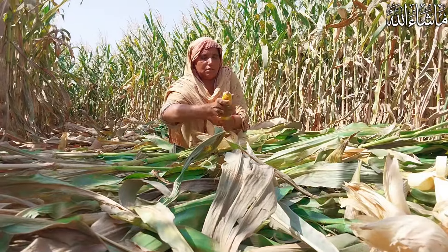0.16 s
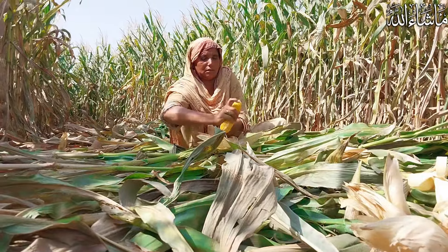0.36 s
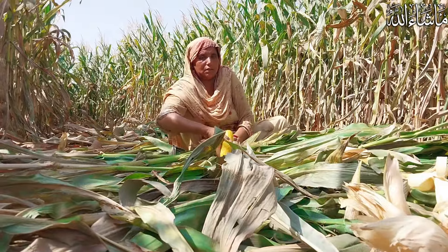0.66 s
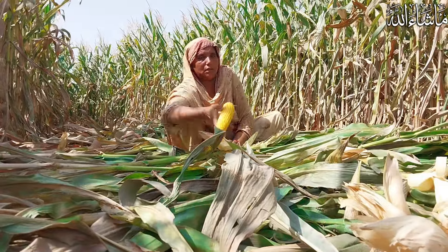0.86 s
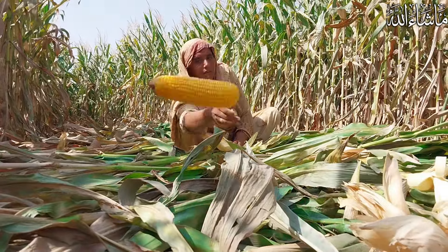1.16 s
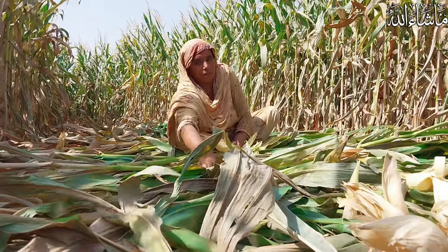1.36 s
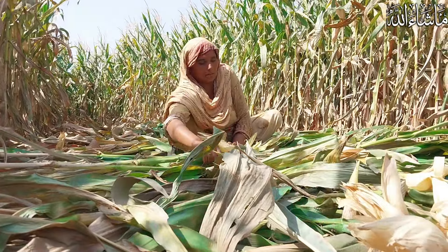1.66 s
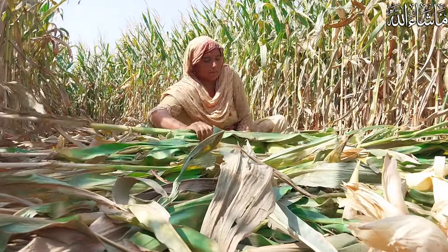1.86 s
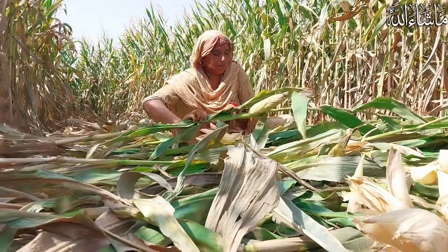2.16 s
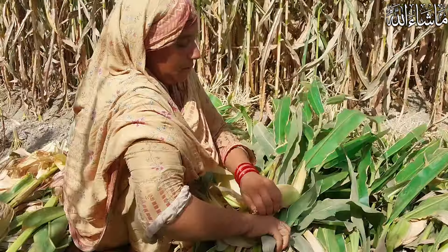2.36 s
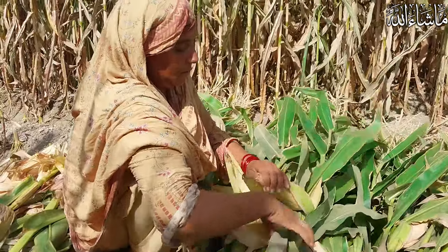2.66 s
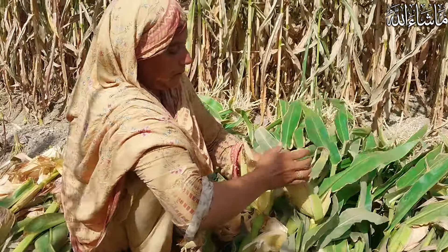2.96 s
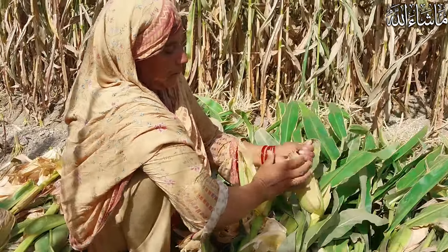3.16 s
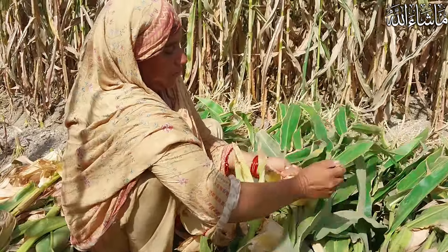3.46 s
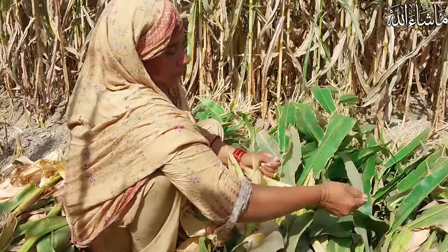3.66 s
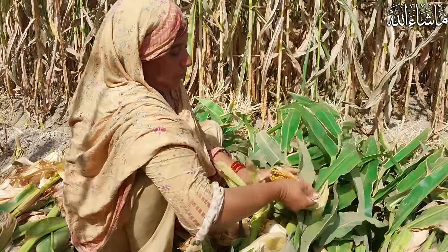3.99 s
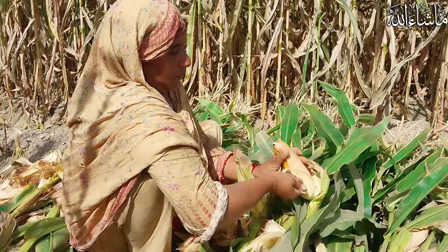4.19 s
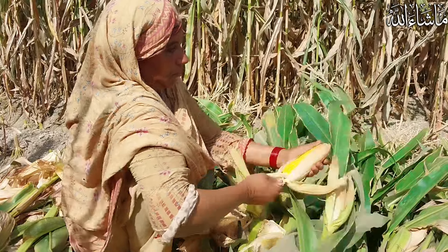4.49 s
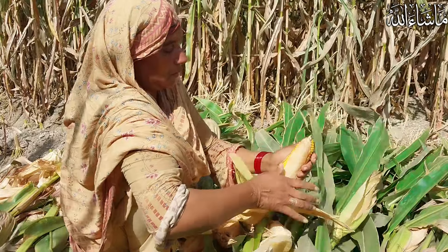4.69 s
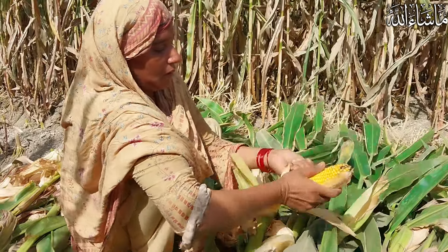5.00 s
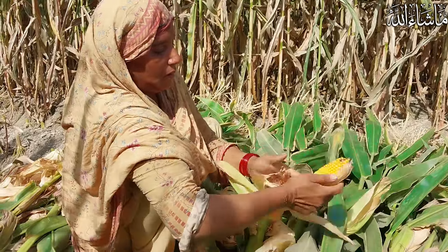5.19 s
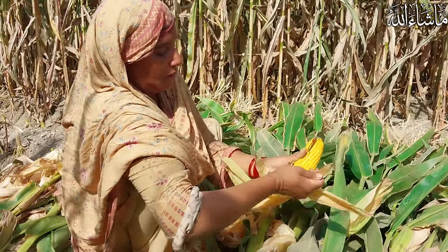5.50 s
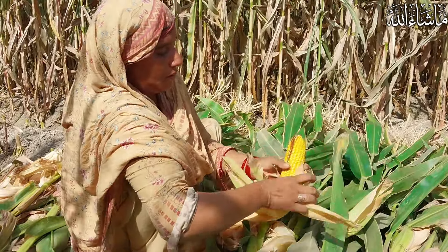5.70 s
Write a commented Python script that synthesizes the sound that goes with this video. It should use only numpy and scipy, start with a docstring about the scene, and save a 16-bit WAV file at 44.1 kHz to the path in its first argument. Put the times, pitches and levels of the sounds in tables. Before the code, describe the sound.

Dry corn husks rustle, crackle and tear under busy hands, quiet at first, then close and loud, over a faint throbbing engine.

```python
"""Corn leaves crinkle and tear under the hands as an ear is husked: random creases excite filtered noise.
Husks squeak by stick-slip as short wavering tones, and snap as resonances struck by dying noise.
A cob and the hands drop on a springy heap of leaves, whose four modes ring low.
Behind them a distant single-cylinder pump engine throbs in harmonics of its firing rate, and the field hisses.
Two microphone ports hear the handling a little to the right, by differences of level and arrival time."""
import sys
import numpy as np
from scipy import signal
from scipy.fft import rfft, irfft, next_fast_len
from scipy.io import wavfile
from scipy.ndimage import uniform_filter1d, map_coordinates

SR = 44100
rng = np.random.default_rng(int(sys.argv[2]) if len(sys.argv) > 2 else 0)


def put_to_file(sound):
    """Save the sound as 16-bit audio at rate SR, in the file named by the first command-line argument."""
    columns = np.atleast_2d(sound).T  # one column per channel
    safe = np.clip(columns, -1, 1)
    whole_steps = np.round(safe * 32767)
    wavfile.write(sys.argv[1], SR, whole_steps.astype(np.int16))


N = 257544

# Relative noise spectra: [f/Hz, spectral level/dB per Hz]
# standing corn stirring all round
FIELD_SPECTRUM = [(180, -47), (300, -20), (954, -14), (1180, -16), (2040, 3), (2660, -21), (4230, -2),
                  (8600, -48), (12400, -8), (15600, -5.5)]
# engine drone
DRONE_SPECTRUM = [(16, -54), (28, -21), (40, -1), (60, -1), (108, 2.5), (130, -9.5), (200, -10.5),
                  (344, -40), (450, -61), (580, -75), (990, -120)]
# leaf crinkle
CRINKLE_SPECTRUM = [(590, -18.5), (1000, -8.5), (1050, -10), (1200, -8.5), (1430, -6.5), (1720, -5.5),
                    (1960, -1), (3970, -1), (5430, -1.5), (7280, -3), (9000, -17), (11700, -62),
                    (19800, -120)]
# bright sizzle of tearing fibres
SIZZLE_SPECTRUM = [(5500, -43), (8000, -9), (9100, -7), (11100, 1.5), (13600, 0), (15600, -4.5)]
# husk body
BODY_SPECTRUM = [(150, -70), (280, -5), (400, -0.5), (800, 0.5), (1300, -4.5), (1900, -1), (3500, -39)]
# heap thumping under the leaves
THUMP_SPECTRUM = [(50, -54), (120, -3.5), (210, 2.5), (330, -6), (520, -29), (1000, -72)]

FIRING_HZ, FIRST_FIRING_S = 16.89, 0.0487
# Third and fourth engine orders, before breeze and lean: [median rms level/dB]
STRONG_ORDERS_DB = (-54, -54.5)
# Upper engine orders, before breeze and lean: [multiple of firing rate, median rms level/dB]
UPPER_ORDERS = [(5, -62), (6, -57.5), (7, -65), (8, -67)]
# Slowly sinking hums just under the two strong orders, so that each pair beats:
# [start t/s, end t/s, median rms level/dB, in-phase t/s, beat rate there/Hz, beat rate growth/(Hz per s)]
HUMS = [(3, 6.5, -52.5, 2.365, 2.113, 0.334), (0, 2.22, -53, 0.38, 1.92, 0.41)]
HUM_FADE_S = 0.06
# How well the engine carries on the breeze: [t/s, level over usual/dB]
BREEZE = [(0, -1.5), (1.1, -1.5), (2, 0), (2.4, 4), (3.2, 0), (3.9, 0.5), (4.8, 1), (5.84, -0.5)]
ENGINE_LEAN_DB = -1.5  # left minus right

# Modes of the heap, relaxed and at pitch factor 1: [f/Hz, level/dB, t60/s]
HEAP_MODES = [(127.6, -3, 0.067), (229, -6, 0.03), (460, -3.5, 0.022), (690, -9, 0.022)]
# Cob and hands dropping on the heap:
# [t/s, level/dB, pitch factor, second mode gain/dB, upper modes gain/dB]
THUDS = [(0.044, -43, 1.42, -15, -15), (1.4143, -35.5, 1.14, 12.5, 10), (1.4227, -18.5, 0.934, 1, 1),
         (1.456, -33, 1.08, -6, -8), (1.5112, -40, 1.8, -2, -8), (1.5407, -23.5, 1.28, -0.5, -16),
         (1.809, -33, 1.3, -21, -6.5), (2.792, -35, 0.84, -4, -13), (2.872, -30.5, 1.46, -2, -13),
         (3.574, -27.5, 1.28, -10, -17), (4.579, -26.5, 1.37, -9, -6), (4.598, -28.5, 1.43, -13, -5)]
STIFFER, RELAX_S = 1.47, 0.0061  # initial pitch rise as a share of the lowest mode; its time constant
SMOTHER = 2  # exponent over 1: the ring holds, then loose leaves choke it

# Husk and stalk ringing as they slip or give: [middle t/s, nominal level/dB, middle f/Hz, length/s]
CREAKS = [(0.105, -52, 2010, 0.037), (0.374, -55, 1900, .025), (2.3746, -13, 2740, 0.002),
          (2.378, -14.5, 2280, 0.0026), (2.379, -21.5, 620, 0.0073), (2.392, -10, 900, 0.0034),
          (2.393, -6, 3450, 0.0019), (3.429, -30.5, 1440, 0.012), (3.481, -38, 1020, .015),
          (3.494, -29, 2310, 0.016), (3.504, -26.5, 1037, 0.019), (3.509, -25, 1880, 0.019),
          (3.523, -30, 1024, 0.016), (3.525, -25, 1990, 0.0065), (3.559, -26.5, 2000, 0.014),
          (3.585, -24, 1085, 0.015), (3.592, -22, 2870, 0.0028), (3.477, -31, 1610, 0.012),
          (3.502, -33, 3050, 0.01), (3.527, -28.5, 3240, 0.014), (3.566, -32, 2130, 0.01),
          (3.599, -28, 1450, 0.012), (3.636, -29, 1350, 0.0053), (3.578, -30, 1970, .01),
          (3.575, -24, 2950, 0.0053)]
# Husks and stalks snapping:
# [t/s, knock level/dB, centre f/Hz, relative crack setting/dB, nominal t60/s, left minus right level/dB]
SNAPS = [(0.302, -39, 4310, -11, 0.025, -2), (0.434, -53, 2100, 11, 0.018, -2),
         (1.327, -22, 4960, 4, 0.015, 11), (1.335, -23.5, 4460, -1.5, 0.029, -12),
         (1.414, -15, 4050, 12, 0.013, -2), (1.421, -19, 1460, 3.5, 0.011, -9.5),
         (1.455, -29.5, 1280, 4.5, 0.013, -3), (1.54, -30, 1240, 6.5, 0.022, -3.5),
         (1.809, -26.5, 4800, -6, 0.19, 5.5), (2.153, -29.5, 4930, -5, 0.045, 2),
         (2.307, -32, 2020, 6, 0.016, 0), (2.3745, -12, 2590, -1.5, 0.029, -8),
         (2.391, -2.5, 1530, -5, 0.012, -2.5), (2.475, -29, 2890, -1, .012, -4),
         (2.5975, -20, 6500, 4.5, 0.0069, -6), (2.562, -28, 1500, -6, 0.0097, 0),
         (2.725, -27.5, 1800, 5, 0.016, -11), (2.752, -28.5, 2500, 7.5, 0.0074, -5),
         (2.786, -24, 2000, -6, .012, -4), (2.837, -20, 3000, -5, 0.013, -9),
         (3.095, -34, 6000, 9, 0.0092, -9), (3.153, -32.5, 4570, -6, 0.012, -7),
         (3.201, -31.5, 1410, 3, 0.055, -4), (3.252, -28.5, 3340, 2, 0.022, -4),
         (3.324, -30, 2340, -7, .012, -7), (3.369, -27, 2490, -11, 0.0093, 0),
         (3.398, -13.5, 4500, -4, 0.0085, -7), (3.523, -20, 2800, -19, 0.024, 7.5),
         (3.623, -17, 1410, -16, 0.011, 2), (3.636, -18, 1410, -19, 0.028, -2),
         (4.259, -25, 3560, -19, 0.037, -6), (4.286, -23, 3270, -20, 0.011, 6),
         (4.303, -27.5, 3500, -2.5, 0.0092, -7), (4.404, -21, 1450, -8, 0.019, 1),
         (4.47, -24, 3190, 3, 0.012, -4), (4.578, -24, 2020, -11, 0.022, 1),
         (4.965, -26, 2500, -8, 0.017, -4), (5.158, -44, 3000, -5.5, 0.011, -4),
         (5.312, -28, 4000, 8, .012, -4), (5.321, -35.5, 2700, 11.5, 0.015, -14),
         (5.354, -31, 2200, 3, 0.027, -5), (5.513, -37, 4000, -4, .012, -4),
         (5.522, -29, 4000, -4, .012, -6), (5.632, -36, 2470, -9, 0.02, -5),
         (5.755, -33, 4940, -13, 0.013, -12)]

# Restless leaves under the hands: [t/s, crinkle level setting/dB]
STIR = [(0, -54.5), (.2, -58.5), (.45, -58.5), (1.05, -60), (1.31, -58), (1.36, -54), (1.525, -61),
        (1.65, -48), (2.02, -52.5), (2.28, -43), (2.5, -38), (2.68, -41), (3.15, -44), (3.35, -43.5),
        (3.8, -37), (4.2, -42), (4.7, -35), (5.15, -45.5), (5.43, -48.5), (5.84, -46.5)]
STIR_MID_DB = -45  # a middling stir
# Sizzle, body and thump under the stir: [level setting at a middling stir/dB, gain/(dB per dB of stir)]
FOLLOW = [(-45, 1.13), (-58.5, 1.11), (-56, 0.5)]
# Pulls, tears and shoves: [peak t/s, crinkle level setting/dB, 10 dB rise/s and 10 dB fall/s (floor 2 ms),
# sizzle relative level/dB, body relative level/dB, thump relative level/dB]
PULLS = [(.055, -55, -0.1, 0.05, -3, -10, 6), (.45, -60.5, -0.5, 1.4, -2, -17, -6),
         (.63, -57, 0.15, 0.3, -1, -9, -4), (.69, -54, 0.17, 0.16, -0.5, -7, -8),
         (1.323, -40, -0.02, 0.06, 2, -11, -10), (1.371, -49, -0.0862, 0.12, 10.5, -6.5, -10),
         (1.392, -68, -2.5, -5, 4, -9, -4), (1.435, -51, 0.17, 0.6, -14, -15, 2),
         (1.47, -52, -0.1, 0.1, -3, -16, -13), (1.554, -45, -0.01, 0.23, 0, -8, -4),
         (1.63, -48, 0.02, 0.1, 3.5, -4.5, -0.5), (1.733, -43.5, -0.1053, 0.18, 1.5, -15, -7.5),
         (1.829, -47.5, -0.29, 0.1, 1.5, -21, -14), (2.307, -36.5, -0.0277, 0.14, 1, -7.5, -6),
         (2.401, -29, 0.0249, 0.03, -8, -29, -12), (2.58, -39, 0.09, 0.13, -4, -7, -13),
         (2.762, -35, 0.0355, 0.116, 0.5, -3.5, 0), (2.888, -35.5, 0.02, 0.19, 0, -11.5, -12),
         (3.21, -48.5, -0.16, 0.8, 4, -3, -31), (3.29, -54, 0.05, 0.4, -10.5, -5, -26),
         (3.5, -33.5, 0.08, 0.16, -1, -6.5, -14.5), (3.587, -29.5, 0.0282, 0.09, 0, -8.5, -8.5),
         (3.639, -37.5, -0.0163, 0.03, 2, -14, -1), (3.699, -38, 0, 0.11, 0.5, -6, -7.5),
         (3.92, -37, 0.04, 0.11, -6, -8.5, -11), (4.3, -38, -0.16, 0.06, -15, -18, -25),
         (4.41, -35.5, 0.11, 0.07, 1, -7.5, -14), (4.569, -29, 0.09, .08, 0.7, -6, -9.5),
         (4.61, -32.5, -0.015, -0.01, -9, -16, -3.5), (4.689, -31, -0.01, -0.01, -13, -14, -12),
         (4.97, -40.5, 0.15, 0.13, -0.5, -9, -8), (5.315, -43.5, 0.16, 0.02, 1, -12, -24),
         (5.5, -42.5, 0.08, 0.1, 0, -15, -17), (5.7, -47, 0.02, .005, 2, -11, -7)]

# Likeness of the two sides: [f/Hz, correlation]
ALIKE = [(100, 0.8), (400, 0.83), (1000, 0.19), (2500, 0.05), (6000, 0.33), (12000, 0.1)]
# Level difference between the ports: [f/Hz, left minus right level/dB]
PORT_LEAN = [(60, -4), (150, -2), (380, -3), (950, -2), (2380, -3), (5980, -1), (15000, -8.5)]
LATER_LEFT_S = 2.42  # from here on the left port hears the rustle later
# Delay of the left port behind the right, before and after that time: [delay/s]
PORT_LAGS_S = (.00005, 0.000387)
# Bass roll-off of the microphone, and upper band limit of the sound: [f/Hz, level/dB]
BAND_EDGES = [(15, -12), (40, 0), (15750, 0), (15900, -28)]
TOP_HZ = 16855  # nothing sounds from here up

SIDES = np.array([[.5], [-.5]])  # left, right halves of a difference


def amp(db):
    """Decibel law: level in dB to amplitude gain."""
    return 10 ** (np.asarray(db) / 20)


def unit(x):
    """Normalisation to an rms of 1."""
    return x / np.sqrt(np.mean(x ** 2) + 1e-20)


def along(points, hz):
    """Interpolation of (Hz, value) points on a logarithmic frequency axis."""
    f, v = np.transpose(points)
    return np.interp(np.log(hz + 1), np.log(f + 1), v)


def curves(rows):
    """Linear interpolation in time: one value per sample for each column after the time."""
    s, *columns = np.transpose(rows)
    return [np.interp(np.arange(N) / SR, s, column) for column in columns]


def wobble(rate):
    """Band-limited fluctuation: a smooth random curve with rate knots a second."""
    knots = rng.standard_normal(400)
    return map_coordinates(knots, [np.arange(N) * np.clip(rate, 0, 60) / SR])


def filtered(x, response):
    """Linear filtering: the spectrum of x times a complex frequency response."""
    m = next_fast_len(N + 8192)
    return irfft(rfft(x, m) * response(np.fft.rfftfreq(m, 1 / SR)), m)[..., :N]


def pair(spectrum, envelope=1):
    """Partial coherence: rms 1 stereo noise whose mid-side balance sets the likeness of the sides."""
    def mid_side(hz):
        turn = np.arccos(np.clip(along(ALIKE, hz), 0, 1)) / 2
        return amp(along(spectrum, hz)) * [np.cos(turn), np.sin(turn)]

    noise = rng.standard_normal((2, N)) * envelope
    mid, side = filtered(noise, mid_side)
    return unit(np.array([mid + side, mid - side]))


def chirrups(s, db, hz, length, size):
    """Stick-slip vibration: short wavering tones, one for each row, centred on their times."""
    t = (np.arange(size) - size // 2) / SR
    bend, start = rng.standard_normal((2, len(s), 1))
    u = t / length[:, None]
    tone = np.sin(2 * np.pi * hz[:, None] * t * (1 + 0.015 * bend * u) + 3 * start)
    stutter = uniform_filter1d(rng.standard_normal(tone.shape), size=40)
    grip = .95 + .45 * unit(stutter)
    rows = amp(db)[:, None] * np.exp(-8 * u ** 2) * grip * tone
    at = np.round(s * SR).astype(int)[:, None] + np.arange(size)
    return np.bincount(at.ravel(), rows.ravel(), N + size)[size // 2:][:N]


def field():
    """Diffuse broadband noise: standing corn hisses all round at a wavering level."""
    return amp(-58.0 + wobble(4.1)) * pair(FIELD_SPECTRUM)


def engine():
    """Harmonics of a pulse train: wavering firing orders, two beating with hums, over a throbbing drone."""
    t = np.arange(N) / SR
    turns = FIRING_HZ * (t - FIRST_FIRING_S) + 0.03 * wobble(1.32)

    def order(k, db, behind=0):
        """A sinusoid at a multiple of the firing rate, behind by so many cycles."""
        phase = 2 * np.pi * (k * turns - behind) + 0.24 * wobble(4.08)
        return -np.sqrt(2) * amp(db) * np.cos(phase)

    strong = 0
    for k, db, hum in zip((3, 4), STRONG_ORDERS_DB, HUMS):
        start, end, hum_db, together, rate, faster = hum
        heard = np.clip(np.minimum(t - start, end - t) / HUM_FADE_S, 0, 1)
        beats = (t - together) * (rate + faster * (t - together) / 2)
        strong = strong + order(k, db + 1.4 * wobble(2.36))
        strong = strong + heard * order(k, hum_db + 2.5 * wobble(2.07), beats)
    upper = sum(order(k, db + 2.0 * wobble(3.84)) for k, db in UPPER_ORDERS)
    drone = amp(-51.0) * pair(DRONE_SPECTRUM, 1 + 0.27 * np.cos(2 * np.pi * turns))
    return (strong + upper + drone) * amp(curves(BREEZE)[0] + ENGINE_LEAN_DB * SIDES)


def thuds():
    """Modal ringing of a nonlinear spring: each blow stiffens the heap, and the pitch sags as it relaxes."""
    out, t = np.zeros(N + 8192), np.arange(8192) / SR
    squeeze = STIFFER * RELAX_S * (1 - np.exp(-t / RELAX_S))
    extra = HEAP_MODES[0][0] * squeeze  # equal Hz on every mode, so the lowest bends most
    for s, db, pitch, second_db, top_db in THUDS:
        modes = []
        for hz, level, t60 in HEAP_MODES:
            envelope = amp(level - 60 * (t / t60) ** SMOTHER) * (1 - np.exp(-t * hz / 0.42))
            modes.append(envelope * np.sin(2 * np.pi * pitch * (hz * t + extra)))
        low, second, *top = modes
        out[round(s * SR):][:8192] += amp(db) * (low + amp(second_db) * second + amp(top_db) * sum(top))
    return out[:N]


def creaks():
    """Brief ringing of slipping husk and stalk, 2.4 dB stronger on the right."""
    return chirrups(*np.transpose(CREAKS), size=2048) * amp([[-1.2], [1.2]])


def snaps():
    """Impulsive excitation of a damped resonance: a click and dying noise, with a bright crack on top."""
    size = 4096
    out, t = np.zeros((2, N + size)), np.arange(size) / SR
    f = np.fft.rfftfreq(2 * size, 1 / SR)
    crack_gain = amp(along(SIZZLE_SPECTRUM, f)) + 0.71 * (f > 4500) * (f < 8000)
    click = 1.65 * np.exp(-((t - .0005) / .00008) ** 2)
    for s, db, hz, crack_db, t60, pan_db in SNAPS:
        shared, own = rng.standard_normal(size), rng.standard_normal((2, 2, size))
        life = t / np.clip(t60, .003, .15)
        # the break, then settling fibres
        fall = (amp(-60 * life) + 0.38 * amp(-15 * life)) * (1 - np.exp(-t / 0.00032))
        drive = fall * (shared + 1.4 * own[0]) + click
        resonance = (1j * f * hz * 1.2 / (hz * hz - f * f + 1j * f * hz * 1.14)) ** 2
        knock = irfft(rfft(drive, 2 * size) * resonance)[:, :size]
        crack = unit(irfft(rfft(own[1], 2 * size) * crack_gain)[:, :size])
        burst = knock / np.abs(knock).max() + amp(crack_db - 5.0) * fall * crack
        out[:, round(s * SR):][:, :size] += amp(db + pan_db * SIDES) * burst
    return out[:, :N]


def handling():
    """Addition of powers: stir and pulls give the dB levels of crinkle, sizzle, body and thump."""
    t, (stir_db,) = np.arange(N) / SR, curves(STIR)
    followers = [db + grows * (stir_db - STIR_MID_DB) for db, grows in FOLLOW]
    power = amp([stir_db] + followers) ** 2
    for s, db, rise, fall, *rel_db in PULLS:
        tenths = np.where(t < s, (s - t) / max(rise, .002), (t - s) / max(fall, .002))
        shape = amp(db - 10 * tenths) ** 2
        power += shape * amp(np.array([[0, *rel_db]]).T) ** 2
    return 10 * np.log10(power)


def squeaks(count=1500):
    """Stick-slip at random: the husk rings some cycles at a time in many small squeaks in the rustle."""
    when, size = rng.random(count) * N / SR, np.minimum(rng.exponential(size=count), 4)
    hz = 2600 * np.exp(.5 * rng.standard_normal(count)).clip(.55, 3)
    db = handling()[0][(when * SR).astype(int)] - 6 + 1.1 * size
    return chirrups(when, db, hz, 9 / hz, size=512)


def creases(per_second, spread_db, t60, bed):
    """Shot noise: leaf creases pop at random with quick decay, over a steady bed of finer ones."""
    chance, size = rng.random(N), np.minimum(rng.exponential(size=N), 4.5)
    popping = chance < per_second * amp(4 * wobble(25)) / SR
    pops = popping * amp(spread_db * size) ** 2
    power = signal.lfilter([1], [1, -amp(-120 / (t60 * SR))], pops)
    return np.sqrt(bed + power / np.mean(power))


def leaves():
    """Buckling noise: crinkle, sizzle and body share pops, fibres tick, and the heap thumps in slow lumps."""
    db, sizzle_db, body_db, thump_db = handling()
    pops = creases(per_second=360, spread_db=1, t60=0.033, bed=4.3)
    crinkle_ticks = creases(per_second=160, spread_db=2.5, t60=0.0042, bed=0.012)
    sizzle_ticks = creases(per_second=160, spread_db=2.0, t60=0.0045, bed=.01)
    soft_pops = uniform_filter1d(pops, size=90)
    ticks = amp(db - 7) * pair(CRINKLE_SPECTRUM, crinkle_ticks)
    ticks += amp(sizzle_db - 8) * pair(SIZZLE_SPECTRUM, sizzle_ticks)
    crinkle = amp(db + 2.5) * pair(CRINKLE_SPECTRUM, pops * amp(wobble(17)))
    sizzle = amp(sizzle_db + 1.3) * pair(SIZZLE_SPECTRUM, pops * amp(0.23 * wobble(40)))
    body = amp(body_db + 4.5) * pair(BODY_SPECTRUM, soft_pops * amp(0.49 * wobble(30)))
    thump = amp(thump_db - 0.5) * pair(THUMP_SPECTRUM, amp(1.44 * wobble(22.04)))
    return ticks + crinkle + sizzle + body + thump


def patchy(x, depth_db):
    """Time-frequency modulation: random patches of gain, as no two leaves crackle at the same pitch."""
    z = signal.stft(x, nperseg=256)[2]
    patches = uniform_filter1d(rng.standard_normal(z.shape[1:]), size=5, axis=0)  # along frequency
    patches = uniform_filter1d(patches, size=8, axis=1)  # along time
    return signal.istft(z * amp(depth_db * unit(patches)), nperseg=256)[1][:, :N]


def ports(x):
    """Level and time differences: the right port faces the hands, so it is brighter and reached first."""
    def heard(lag):
        return filtered(x, lambda hz: amp(SIDES * along(PORT_LEAN, hz))
                        * np.exp(-2j * np.pi * hz * SIDES * lag))

    before, after = (heard(lag) for lag in PORT_LAGS_S)
    return np.where(np.arange(N) < LATER_LEFT_S * SR, before, after)


def scene():
    """Superposition: background, heap, creaks and snaps, with leaves and squeaks through the ports."""
    rustle = ports(patchy(leaves(), depth_db=1.5) + squeaks())
    return field() + engine() + thuds() + creaks() + snaps() + rustle


def record(dry):
    """Band limiting: the microphone rolls off the lowest bass, and the sound has a fixed upper band limit."""
    return filtered(dry, lambda hz: amp(along(BAND_EDGES, hz)) * (hz < TOP_HZ))


dry = scene()
out = record(dry)
put_to_file(out)
```